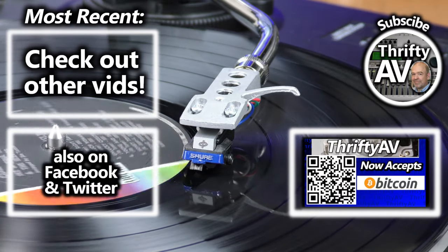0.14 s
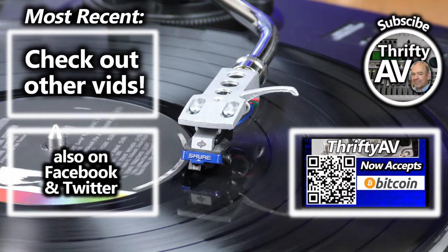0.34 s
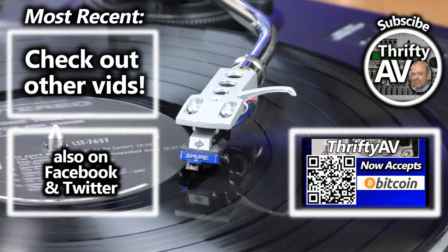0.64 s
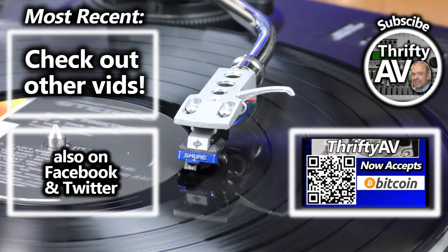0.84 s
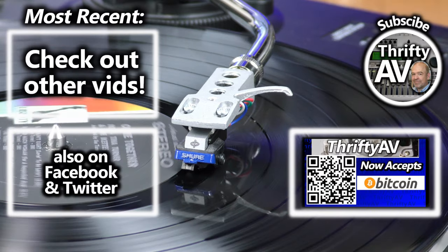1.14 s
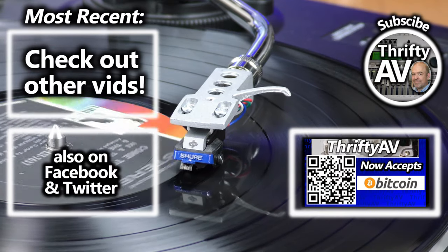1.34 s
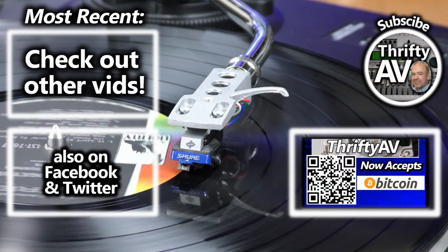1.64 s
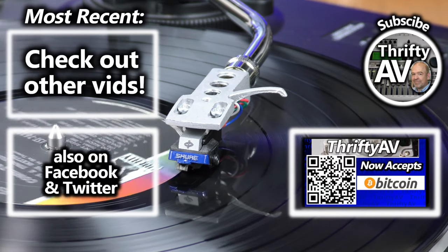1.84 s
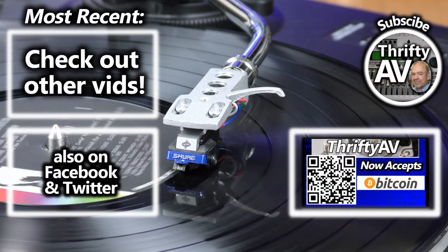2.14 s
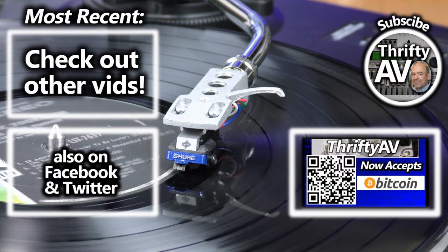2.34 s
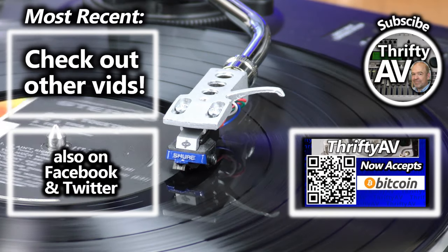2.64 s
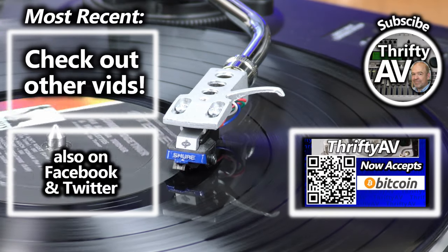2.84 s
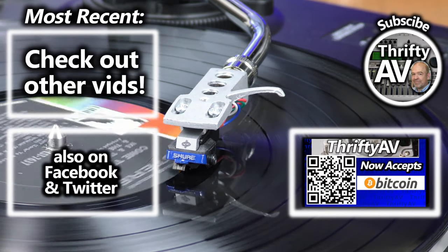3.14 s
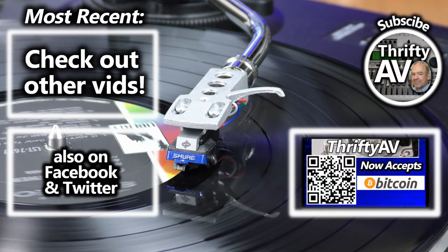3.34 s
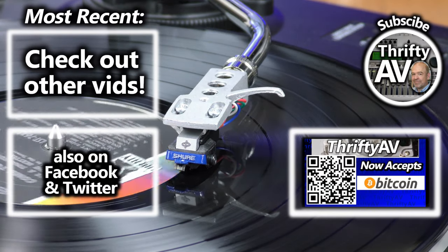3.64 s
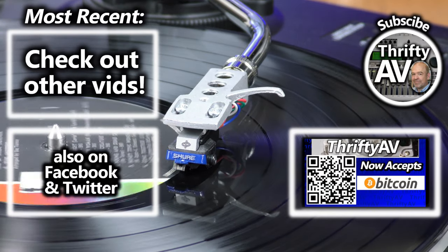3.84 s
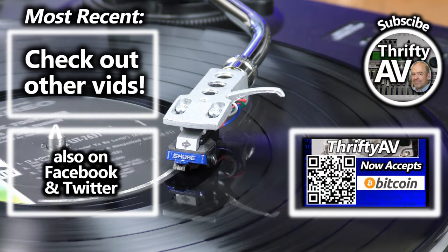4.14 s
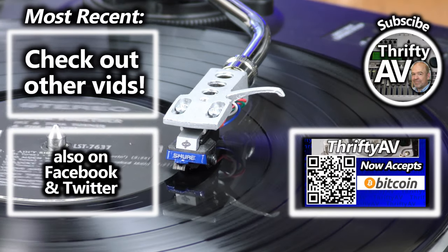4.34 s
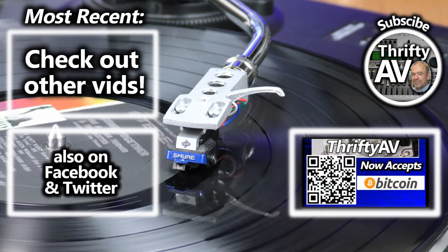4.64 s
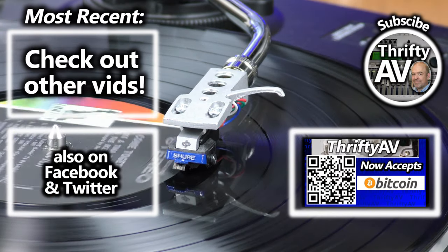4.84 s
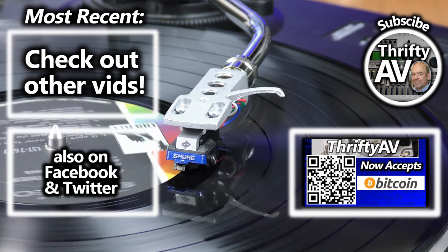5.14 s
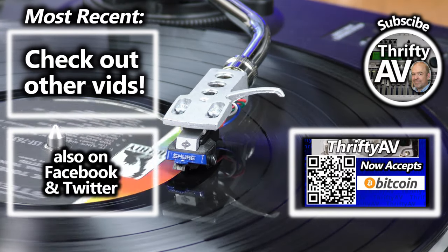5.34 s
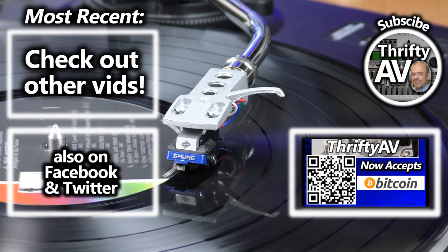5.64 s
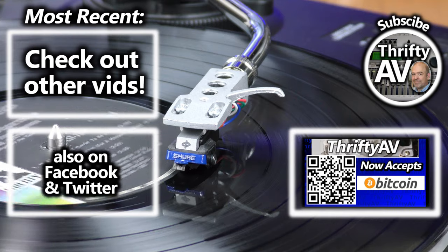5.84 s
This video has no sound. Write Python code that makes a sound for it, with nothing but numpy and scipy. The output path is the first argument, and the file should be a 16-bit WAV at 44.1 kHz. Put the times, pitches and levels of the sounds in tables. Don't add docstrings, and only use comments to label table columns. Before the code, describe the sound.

A stylus in a silent, worn record groove gives irregular crackles, pops and dull thumps over faint hiss and low hum, gradually thinning out.

```python
import sys
import numpy as np
from scipy import signal
from scipy.io import wavfile

SR = 44100
rng = np.random.default_rng(int(sys.argv[2]) if len(sys.argv) > 2 else 0)


def attenuation_scalar(level_db):
    decades = np.asarray(level_db, float) / 20
    return 10 ** decades


def to_wav(sig):
    pcm = np.clip(np.atleast_2d(sig), -1, 1) * 32767
    pcm = np.round(pcm).astype(np.int16)
    wavfile.write(sys.argv[1], SR, pcm.T)


N = 264600

# [start_s, tick_db, cone_ring_db re tick, sparkle_db re tick]
DUST_POPS = [(.198, -38.5, -24, -9), (0.211, -44, 9, -12), (.255, -39.5, 1, -5), (0.2688, -34, -6.5, -28),
             (0.3843, -33.5, -1, -34), (0.3975, -37, -3, -25), (0.4449, -39.5, -5, -8),
             (.454, -40, -19, -5), (0.6276, -35.5, -10, -20), (0.729, -30.5, -6, -15),
             (0.818, -42.5, 6.5, -26), (1.0759, -36.5, -7, -7.5), (1.0851, -33, 3.5, -30),
             (1.332, -40, -7.5, -6.5), (1.5284, -38, 1, -24), (1.6039, -31.5, -3, -16),
             (1.6516, -44, 5, -22), (1.7163, -42.5, 5, -15), (1.8099, -43, 7, -17),
             (1.9014, -37.5, 3.5, -7.5), (2.0, -36.5, 8, -10), (2.0888, -41.5, 3, -16),
             (2.0945, -37.5, -1, -26), (2.2438, -39, -1.5, -7), (2.2551, -38.5, 2.5, -14),
             (2.6254, -38.5, 1.5, -10), (2.735, -29, -12, -18), (3.81, -45, 2, -32),
             (4.2756, -50, 11.5, -6), (4.499, -53.5, 7, -30)]
# [first_s, tick_db, cone_ring_db re tick, loss_a_turn_later_db]
SCRATCHES = [(2.7782, -40.5, -20, 4), (2.801, -31.5, -3, 9), (2.9061, -48, -3, 4), (2.98, -40, 2.5, 1),
             (3.0327, -51, 0, 0), (3.0672, -39.5, -4, 5), (3.1381, -44, 11, 8.5), (3.4611, -42, -8, 5),
             (3.5011, -40.5, -7, 2.5), (3.6563, -58.5, 4.5, -6.5), (3.6724, -55, 5.5, 0),
             (3.7485, -40.5, -5.5, 2), (3.8552, -40, 8, 4.5), (3.8617, -42.5, -4.5, 0.5),
             (3.9566, -40.5, -0.5, 2), (3.9658, -47.5, 9, 8.5), (3.9813, -59, -11, -7),
             (4.072, -48.5, -3, 9.5), (4.159, -45, 2.5, 21)]
# [start_s, tick_db]
HARD_SPECKS = [(0.067, -48), (0.111, -46), (0.1388, -43), (0.479, -49), (0.7738, -45.5), (0.896, -49.5),
               (0.916, -41.5), (0.9856, -49.5), (1.038, -48), (1.213, -46.5), (1.2321, -47.5), (1.289, -43),
               (1.447, -52), (1.4764, -45.5), (1.7805, -42), (1.8595, -43), (1.871, -47), (2.312, -50),
               (2.4941, -44.5), (2.511, -43), (2.522, -42), (2.5413, -41), (3.548, -49), (4.352, -48),
               (4.401, -53), (4.627, -47), (4.739, -51.5), (4.8947, -41.5), (5.213, -52.5), (5.359, -53),
               (0.572, -58), (0.7067, -53), (0.9476, -52), (1.987, -63), (2.144, -57), (2.2284, -59),
               (2.3999, -50), (2.465, -62), (2.6006, -53), (2.6898, -49), (4.2428, -63), (4.3276, -63),
               (4.5386, -58), (5.5318, -71), (5.61, -61), (5.6331, -64), (4.1913, -57)]
# [start_s, tick_db]
SOFT_CRUMBS = [(.1319, -67), (0.1737, -49.5), (.2809, -48), (0.2898, -42.5), (0.3438, -50), (0.732, -55),
               (0.7591, -51), (0.9626, -57), (1.183, -49), (1.358, -51.5), (1.5166, -46.5), (1.5651, -47),
               (1.6273, -55), (1.7118, -47.5), (1.7574, -48.5), (1.8127, -45), (1.8543, -43.5),
               (1.951, -48.5), (2.0341, -42.5), (2.158, -45), (2.1867, -44), (2.3068, -48), (2.3663, -48.5),
               (2.482, -47.5), (2.6217, -61), (2.9188, -66), (0.097, -71), (4.638, -50), (4.9414, -55)]
# [start_s, length_s]
SCUFFS = [(.255, .05), (.75, .04), (1.088, .08), (1.605, .07), (2.002, .06), (2.31, .08), (2.724, .008),
          (2.7315, .007), (4.498, .075), (4.535, .04), (4.938, .025)]
SCUFF_LEVELS = [-64, -60.5, -55, -64, -54, -57.5, -42.5, -41.5, -58, -70, -63]
SCUFF_TREBLE = [3.5, 1, -4.5, 3, -11, -5.5, -13, -3.5, -13, 5.5, -4]
# [pitch_hz, width_hz, level_db]
TWEETER_MODES = [(2250, 1180, 1.5), (4170, 2400, 0)]
# [pitch_hz, width_hz, level_db]
SPARKLE_MODES = [(7160, 2650, 0.5), (9550, 2900, -9), (14300, 1800, -6.5)]
# [pitch_hz, width_hz, level_db]
CONE_MODES = [(1233, 55.6, 9), (1043, 230, 3), (530, 575, -6.5), (282, 82, -10)]
# [start_s, peak_db, pitch_hz]
DENTS = [(.21, -36, 324), (0.241, -39, 250), (.28, -38, 240), (0.729, -50, 276), (0.748, -43, 224),
         (1.084, -49, 330), (1.1, -44, 232), (1.518, -45, 270), (1.564, -45, 243), (1.721, -44.5, 358),
         (1.808, -39.5, 320), (1.813, -40, 142), (1.941, -39.5, 253), (2.03, -37, 302), (2.091, -43, 162),
         (2.111, -54, 130), (2.332, -40, 133), (2.362, -41.5, 222), (2.737, -27.5, 270),
         (2.745, -29.5, 128), (2.759, -31, 134), (3.564, -50, 111), (3.862, -46, 131), (4.274, -51.5, 346),
         (4.779, -45, 312), (4.937, -43.5, 210), (4.943, -47, 119), (5.515, -47, 201), (5.655, -43, 382)]
# [first_s, peak_db, pitch_hz, loss_a_turn_later_db]
WARPS = [(2.782, -37.5, 312, 12), (2.91, -51, 109, -1), (3.065, -48.5, 300, 1.5), (3.185, -52, 266, 2),
         (3.672, -32.5, 132, 2.5), (3.692, -36.5, 151, 5.5), (3.752, -48, 262, 27), (3.775, -47, 303, 12),
         (3.869, -40.5, 235, 11), (3.955, -59, 300, 6), (3.974, -49.5, 270, 5)]
# [first_s, peak_db, pitch_hz, loss_a_turn_later_db]
BUMPS = [
    (1.8995, -30, 330, 14),
    (1.9085, -38, 249, 23),
    (1.917, -33, 270, 14),
    (3.6615, -37, 226, 6),
]
# [pitch_hz, width_hz, level_db]
CABINET_MODES = [(128, 75, -0.5), (251, 41, -9), (270, 64, 6), (373, 22, 2.5), (507, 223, 4.5)]
# [time_s, hiss_db, rumble_db]
GROOVE_WEAR = [(0, -63, -56), (.3, -63, -51.5), (.57, -66, -55.5), (1.35, -70, -57), (1.7, -63.5, -55),
               (2.07, -61.5, -46.5), (2.21, -70, -56), (2.35, -62, -48), (2.57, -69.5, -57.5),
               (2.75, -59, -53), (3.15, -66, -61), (3.6, -67, -59), (4.0, -73.5, -60), (4.38, -81, -63),
               (4.53, -70.5, -58), (4.9, -66.5, -63), (5.4, -72.5, -60), (6, -81.5, -68)]
# [pitch_hz, level_db per Hz]
HISS_SPECTRUM = [(410, -33), (700, -19), (1290, 4.5), (1720, -4.5), (2200, -3.5), (2780, -6), (4550, -3.5),
                 (6130, -7.5), (9790, -10), (14500, -7.5), (15600, -46)]
# [pitch_hz, level_db per Hz]
RUMBLE_SPECTRUM = [(12, -40), (20, 16), (44, -18), (119, 1.5), (174, -3.5), (286, -2.5), (541, -9),
                   (687, -19.5), (900, -1.5), (1170, -21), (1980, -120)]
# [middle_s, half_length_s, level_db]
SWISHES = [
    (3.403, 0.35, -68),
    (5.166, 0.33, -69.5),
]
# [time_s, level_db]
HUM_LEVEL = [(0, -57), (1.1, -61.5), (1.4, -62.5), (2.6, -62.5), (3.12, -62.5), (3.39, -63), (4.3, -69),
             (5.03, -72), (6, -73)]
# [delay_s, left_treble_share, right_treble_share, cone_share]
ECHOES = [
    (.001, -.75, -.7, -1.3),
    (.00344, -.45, -.15, .9),
    (.00645, -.18, -.1, 0),
]
# [pitch_hz, t60_s]
TAIL_T60 = [(100, 0.29), (260, 0.26), (700, 0.32), (1840, 0.22), (4850, 0.28), (12000, 0.3)]
# [pitch_hz, likeness]
LIKENESS = [(60, 0.98), (180, 0.97), (550, 0.82), (1650, 0.41), (4970, 0.22), (15000, 0.015)]
# [pitch_hz, left_minus_right_db]
LEAN = [(60, -5.5), (180, 0.5), (550, -3.5), (1650, 0.5), (4970, 0.5), (15000, -3.5)]
# [pitch_hz, width_hz, share]
DRIVER_DIPS = [(1480, 310, 0.4), (1743, 213, 0.65), (2616, 1000, 0.65), (6220, 900, 0.35)]

TURN_S = 1.8003
SCRATCH_SPARKLE_DB, SPARKLE_PER_RING = -8, -0.013
SPECK_RING_DB, SPECK_SPARKLE_DB = -6.5, -7.5
CRUMB_RING_DB, CRUMB_SPARKLE_DB = 1.5, -7
GRIT_DB, GRIT_FOLLOWS = -70.5, 0.68
GRIT_PER_S, SCUFF_PER_S = 300, 1500
TICK_COLOUR_DB = 3.0
BLUNT_HZ = 5190
CHIP_S, CHIP_SNAP, CHIP_SPARKLE = .0006, .35, .9
HISS_DB, RUMBLE_DB = 9.5, 14.5
SWISH_HZ, SWISH_WIDTH_HZ = 4480, 3200


def ticks(grit_db):
    start_s, tick_db, ring_db, sparkle_db = dust()
    at = (start_s * SR).astype(int)
    sizes = attenuation_scalar(3.75 * np.minimum(rng.exponential(1, N), 3)) * rng.choice([-1, 1], N)
    chance = rng.random(N)
    grit = attenuation_scalar(grit_db) * sizes * (chance < GRIT_PER_S / SR)
    scuff_grains = sizes * (chance < SCUFF_PER_S / SR)
    bright = grit + scuff_level(np.add(SCUFF_LEVELS, SCUFF_TREBLE)) * scuff_grains
    dull = grit + scuff_level(SCUFF_LEVELS) * scuff_grains

    snap, ring, sparkle = bright * attenuation_scalar(-4.0), dull * attenuation_scalar(-3.5), bright * attenuation_scalar(-2.0)
    snap[at] += attenuation_scalar(tick_db + 6.5)
    ring[at] += attenuation_scalar(tick_db + ring_db + 4.5)
    sparkle[at] += attenuation_scalar(tick_db + sparkle_db + 3.0)
    for k in (1, 2):
        later = at + 2 + (chance[at + k] * CHIP_S * SR).astype(int)
        sign = np.sign(sizes[at + k])
        snap[later] += CHIP_SNAP * sign * snap[at]
        sparkle[later] += CHIP_SPARKLE * sign * sparkle[at]

    blunt = signal.butter(4, BLUNT_HZ, fs=SR, output="sos")
    thin = signal.butter(2, BLUNT_HZ, "high", fs=SR, output="sos")
    treble = signal.sosfilt(blunt, body(snap, TWEETER_MODES))
    treble = treble + signal.sosfilt(thin, body(sparkle, SPARKLE_MODES))
    return treble, signal.sosfilt(blunt, body(ring, CONE_MODES))


def dust():
    scratches = [(*row, SCRATCH_SPARKLE_DB + SPARKLE_PER_RING * row[2]) for row in second_turn(SCRATCHES)]
    specks = [(*row, SPECK_RING_DB, SPECK_SPARKLE_DB) for row in HARD_SPECKS]
    crumbs = [(*row, CRUMB_RING_DB, CRUMB_SPARKLE_DB) for row in SOFT_CRUMBS]
    return np.transpose(DUST_POPS + scratches + specks + crumbs)


def second_turn(rows):
    passes = []
    for s, level_db, trait, loss_db in rows:
        passes.append((s, level_db, trait))
        passes.append((s + TURN_S, level_db - loss_db, trait))
    return passes


def scuff_level(levels_db):
    t = np.arange(N) / SR
    return sum(attenuation_scalar(level_db) * (t > start) * (t < start + length)
               for (start, length), level_db in zip(SCUFFS, levels_db))


def body(x, modes):
    def through(v, uneven_db):
        return sum(attenuation_scalar(level_db) * resonate(v * attenuation_scalar(uneven_db[k]), hz, width_hz)
                   for k, (hz, width_hz, level_db) in enumerate(modes))
    uneven_db = TICK_COLOUR_DB * rng.standard_normal((len(modes), N))
    click = through(signal.unit_impulse(2000), np.zeros(len(modes)))
    return through(x, uneven_db) / np.abs(click).max()


def thumps():
    push = np.zeros(N + SR)
    t = np.arange(SR // 20) / SR
    inward = [(*row, -1) for row in DENTS + second_turn(WARPS)]
    outward = [(*row, 1) for row in second_turn(BUMPS)]
    for s, peak_db, hz, way in inward + outward:
        at = round(s * SR - .2 * SR / hz)
        swell = t * hz / 0.25
        rock = np.sin(2 * np.pi * hz * t) * swell * np.exp(1 - swell)
        push[at:at + len(t)] += way * attenuation_scalar(peak_db) * rock
    boom = sum(attenuation_scalar(level_db) * resonate(push, hz, width_hz) for hz, width_hz, level_db in CABINET_MODES)
    return (attenuation_scalar(-7.0) * push + attenuation_scalar(1.0) * boom)[:N]


def groove(hiss_db, rumble_db):
    shared = drift(16)

    def shape(hz):
        hiss = attenuation_scalar(hiss_db + at_hz(HISS_SPECTRUM, hz) + HISS_DB) * (hz > 600)
        rumble = attenuation_scalar(rumble_db + at_hz(RUMBLE_SPECTRUM, hz) + RUMBLE_DB)
        return np.hypot(hiss, rumble) * attenuation_scalar(1.3 * shared + 1.6 * drift(14))
    return bands(shape, size=N)


def swish():
    t = np.arange(N) / SR
    swell = sum(attenuation_scalar(level_db) * np.exp(-((t - s) / half_s) ** 4) for s, half_s, level_db in SWISHES)
    noise = rng.standard_normal((3, N))
    wash = noise[0] + 0.28 * noise[1:]
    for _ in range(2):
        wash = resonate(wash, SWISH_HZ, SWISH_WIDTH_HZ)
    return swell * rms_one(wash) * attenuation_scalar(2.0 * drift(14))


def hum():
    t = np.arange(N) / SR
    line = np.sin(2 * np.pi * 59.5 * t) * attenuation_scalar(2.4 * drift(4.1))
    octave = np.sin(2 * np.pi * 119.5 * t) * attenuation_scalar(-1.5 + 8.3 * drift(4.6))
    return attenuation_scalar(in_time(HUM_LEVEL)[0] - 1.0) * (line + octave)


def echoed(x, shares):
    return x + sum(share * np.roll(x, round(row[0] * SR)) for row, share in zip(ECHOES, shares))


def room(x, onset_s):
    t = np.arange(SR // 2) / SR

    def decay(hz):
        t60_s = at_hz(TAIL_T60, hz)
        return attenuation_scalar(-60 * t / t60_s) / np.sqrt(t60_s)
    tail = bands(decay, size=len(t))
    tail *= 1 - np.exp(-(t / onset_s) ** 2)
    tail = tail / np.sqrt(np.sum(tail ** 2) / 2)
    return signal.fftconvolve(x[None], tail, axes=1)[:, :N]


def bands(shape, size):
    out = 0
    edges = 18 * 2 ** (np.arange(31) / 3)
    white = rng.standard_normal((2, 2, size))
    for k, (low, high) in enumerate(zip(edges, edges[1:])):
        band = signal.butter(2, [low, high], "band", fs=SR, output="sos")
        mid, side = signal.sosfilt(band, white[k % 2])
        hz = np.sqrt(low * high)
        alike = np.clip(at_hz(LIKENESS, hz), 0, 1)
        lean = attenuation_scalar(at_hz(LEAN, hz) / 2 * np.array([[1], [-1]]))
        stereo = np.sqrt(1 + alike) * mid + np.sqrt(1 - alike) * side * [[1], [-1]]
        out = out + shape(hz) * lean * stereo
    return out


def resonate(x, hz, width_hz):
    r = np.exp(-np.pi * width_hz / SR)
    feedback = [1, -2 * r * np.cos(2 * np.pi * hz / SR), r * r]
    return signal.lfilter([(1 - r * r) / 2, 0, (r * r - 1) / 2], feedback, x + 1e-18)


def drift(rate):
    r = np.exp(-80 * np.pi * rate / SR)
    slow = signal.lfilter([1], [1, -2 * r, r * r], rng.standard_normal(N // 40 + 2002))[2000:]
    return np.interp(np.arange(N) / 40, np.arange(len(slow)), rms_one(slow))


def rms_one(x):
    return x / np.sqrt(np.mean(x ** 2) + 1e-20)


def in_time(rows):
    s, *columns = np.transpose(rows)
    return [np.interp(np.arange(N) / SR, s, column) for column in columns]


def at_hz(points, hz):
    table_hz, values = np.transpose(points)
    return np.interp(np.log(hz), np.log(table_hz), values)


def scene():
    hiss_db, rumble_db = in_time(GROOVE_WEAR)
    treble, cone = ticks(GRIT_DB + GRIT_FOLLOWS * (hiss_db + 57))
    dents = thumps()
    _, left, right, low = np.transpose(ECHOES)
    cone = echoed(cone, low)
    near = np.array([echoed(treble, left), echoed(treble, right)]) + cone
    far = attenuation_scalar(-2.0) * echoed(treble, 0.1 * right) + attenuation_scalar(-3.5) * cone + attenuation_scalar(-4.5) * dents
    walls = room(far, onset_s=.005)
    sound = near * attenuation_scalar([[2.1], [-2.1]]) + dents + walls + groove(hiss_db, rumble_db) + swish()
    for hz, width_hz, share in DRIVER_DIPS:
        sound = sound - np.clip(share, 0, 1) * resonate(sound, hz, width_hz)
    low_cut = signal.sosfilt(signal.butter(3, 70., "high", fs=SR, output="sos"), sound)
    return low_cut + attenuation_scalar(-20.0) * sound + hum()


def top_cut(x):
    return signal.sosfilt(signal.butter(12, 15680, fs=SR, output="sos"), x)


def record(dry):
    low = signal.sosfiltfilt(signal.butter(8, 11200., fs=SR, output="sos"), dry)
    own_hiss = attenuation_scalar(np.linspace(-80, -87, N)) * rng.standard_normal((2, N)) * attenuation_scalar([[-1.5], [1.5]])
    own_hiss = signal.sosfilt(signal.butter(2, 6000., "high", fs=SR, output="sos"), own_hiss)
    miked = low + attenuation_scalar(-13.5) * (dry - low) + own_hiss
    mix = signal.sosfilt(signal.butter(12, 15200., fs=SR, output="sos"), miked)
    return top_cut(mix)


dry = scene()
out = record(dry)
to_wav(out)
```